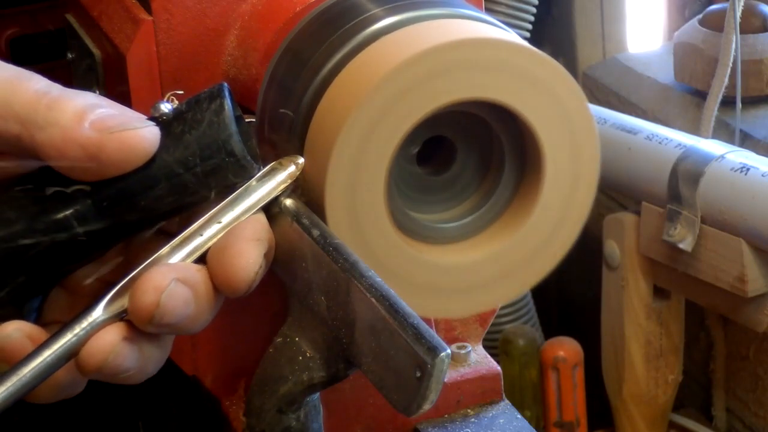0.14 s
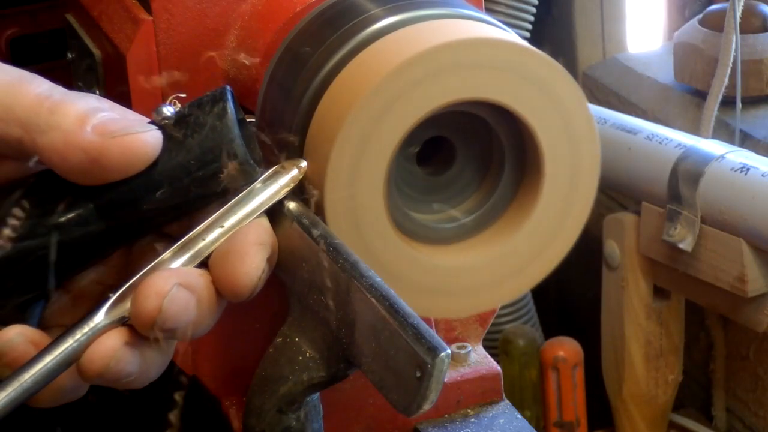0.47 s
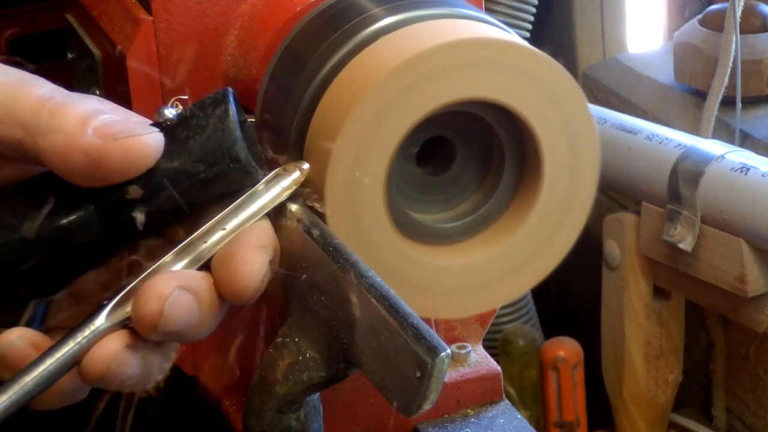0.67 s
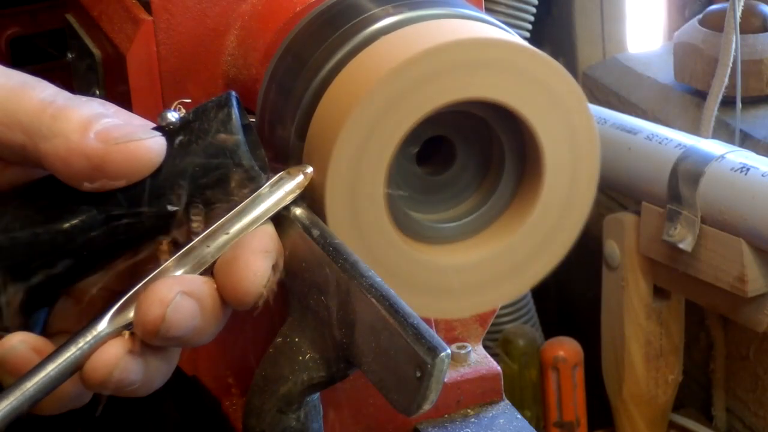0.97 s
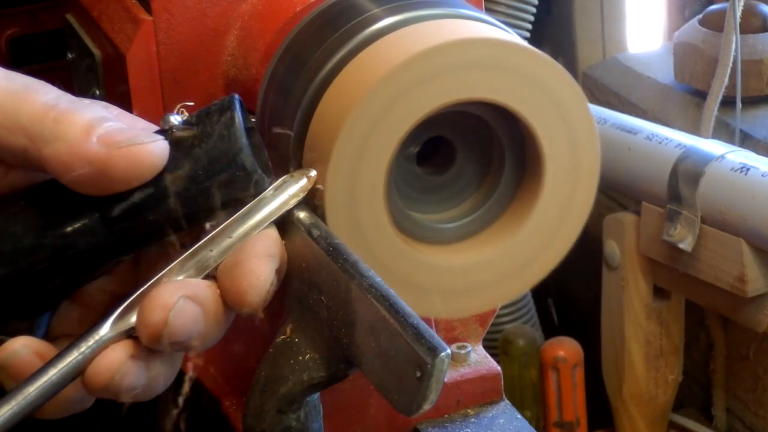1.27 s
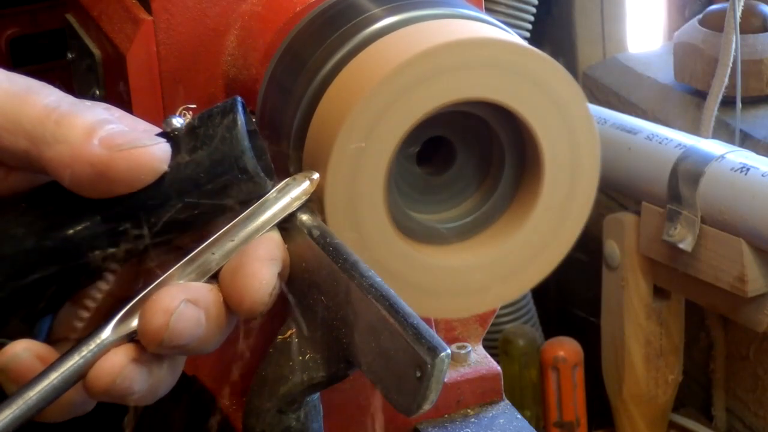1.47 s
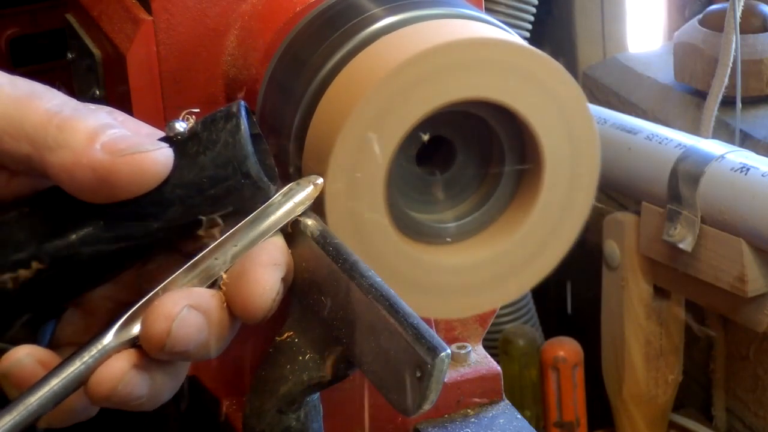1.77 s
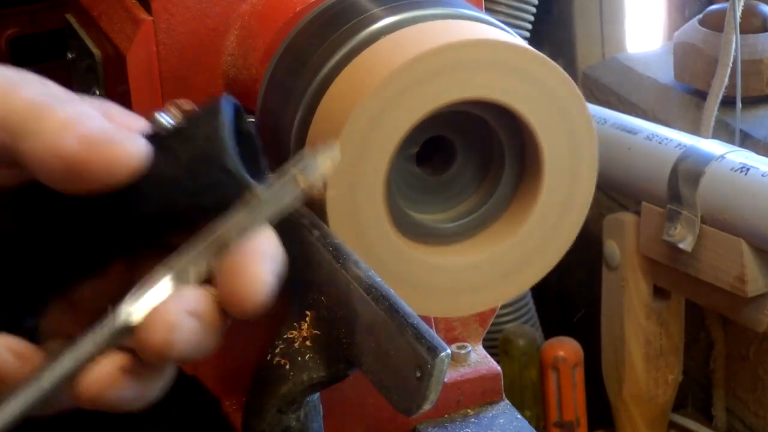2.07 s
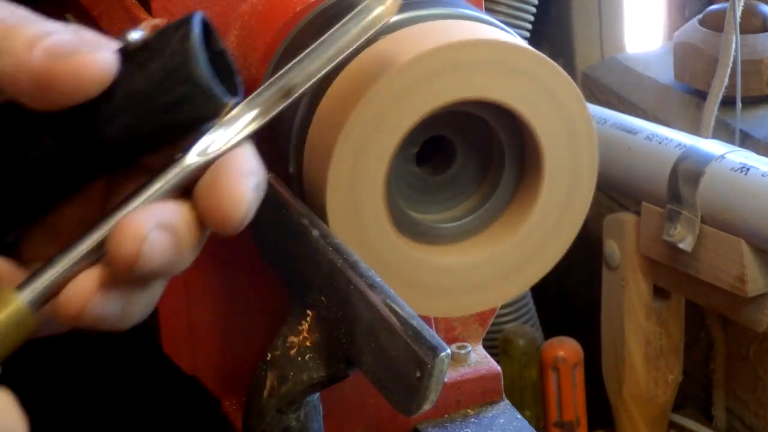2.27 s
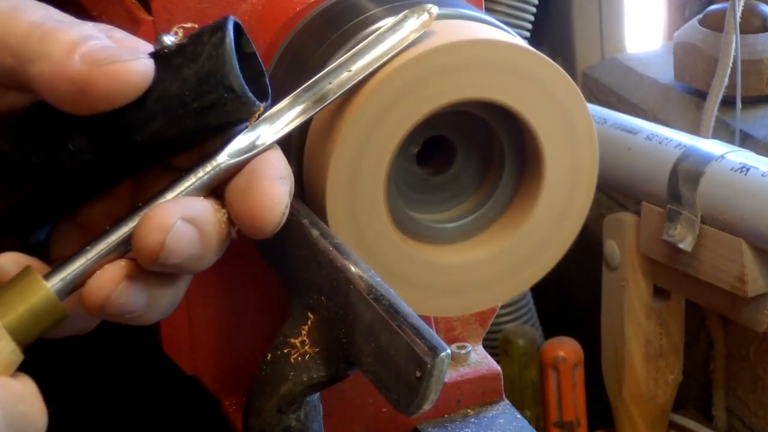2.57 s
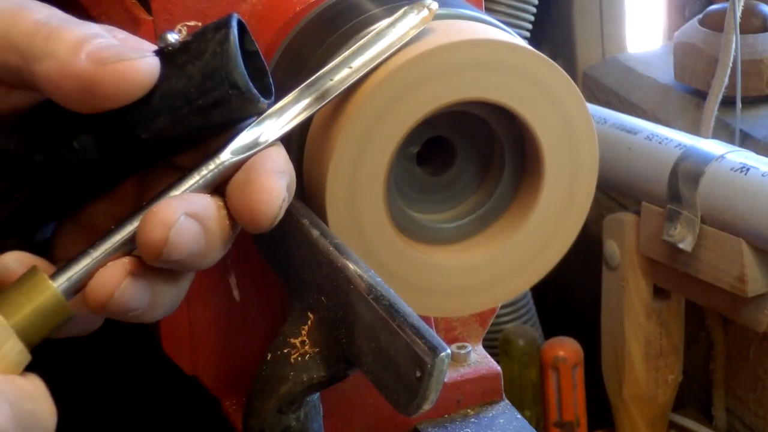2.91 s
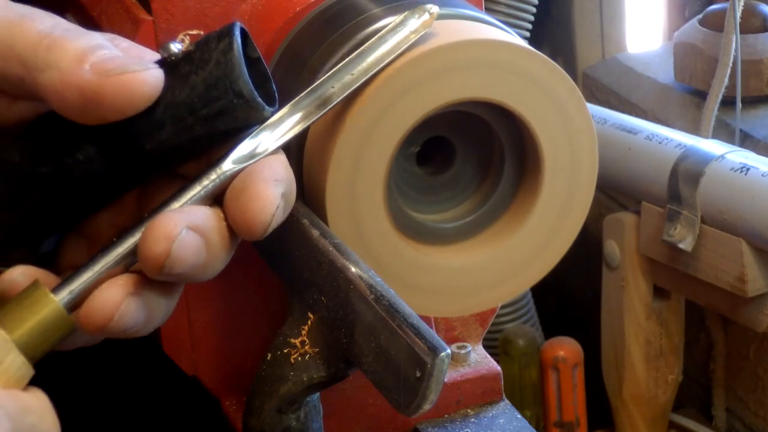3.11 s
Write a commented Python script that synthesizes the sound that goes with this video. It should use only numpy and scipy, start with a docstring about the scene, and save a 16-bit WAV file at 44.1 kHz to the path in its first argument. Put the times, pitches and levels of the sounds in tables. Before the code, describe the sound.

Close up in a small dry workshop, a lathe cut rasps and sings with sizzling shavings for nearly two seconds, stops, the machine drone swells suddenly, and the tool's smooth back buzzes softly on the wood.

```python
"""A gouge cuts a spinning ring glued from twelve wooden segments, lifts off, then its round back rides the ring.
The cut layers unsteady sines at spindle multiples, resonances driven by wood that comes round every turn,
and filtered noise for the shavings; glue joints modulate it. The ride is a dull buzz of the shaft with soft tones.
A lathe drive (sines) and suction hose (patchy noise) drone throughout in a small workshop.
The level is turned up sharply between the two passes."""
import sys
import numpy as np
from scipy import signal
from scipy.fft import rfft, irfft, next_fast_len
from scipy.io import wavfile
from scipy.ndimage import uniform_filter1d, map_coordinates

SR = 44100
rng = np.random.default_rng(int(sys.argv[2]) if len(sys.argv) > 2 else 0)


def transcribe(signal):
    """Save signal, clipped to [-1, 1], as a 16-bit WAV file at the path in sys.argv[1]."""
    frames = np.atleast_2d(signal).T
    limited = np.clip(frames, -1, 1)
    pcm = np.round(limited * 32767).astype(np.int16)
    wavfile.write(sys.argv[1], SR, pcm)


N = 143325
T = np.arange(N) / SR  # time [s]


def amp(db):
    """Gain for a level in dB."""
    return 10 ** (np.asarray(db) / 20)


def unit(x):
    """Scale to rms 1."""
    return x / np.sqrt(np.mean(x ** 2) + 1e-20)


def along(points, hz):
    """Read (frequency [Hz], value) points on a log frequency axis."""
    f, v = np.transpose(points)
    return np.interp(np.log(hz + 1), np.log(f + 1), v)


def curves(rows):
    """One value per sample for each column after the time."""
    s, *cols = np.transpose(rows)
    return [np.interp(T, s, c) for c in cols]


def wobble(rate):
    """A smooth random curve, rate knots a second."""
    knots = rng.standard_normal(int(N * rate / SR) + 4)
    return map_coordinates(knots, [T * rate])


def filtered(x, response):
    """Shape x by a complex response of frequency."""
    m = next_fast_len(N + SR // 2, True)
    return irfft(rfft(x, m) * response(np.fft.rfftfreq(m, 1 / SR)), m)[..., :N]


def body(x, base, peaks=()):
    """Causal colour: a smooth base with resonances on top; rms 1."""
    def response(f):
        power = amp(along(base, f)) ** 2
        for centre, width, db in peaks:
            power = power + (amp(db) * f * width) ** 2 / ((centre ** 2 - f * f) ** 2 + (f * width) ** 2)
        # folding the cepstrum forward gives minimum phase
        cepstrum = irfft(np.log(power + 1e-12) / 2)
        fold = np.r_[1, 2 * np.ones(len(f) - 2), 1, np.zeros(len(f) - 2)]
        return np.exp(rfft(cepstrum * fold))
    return unit(filtered(x, response))


def tones(rows, waver_db, rate):
    """Sines wavering in level and phase, from (frequency [Hz], rms level [dB]) rows."""
    total = 0
    for hz, db in rows:
        gain = np.sqrt(2) * amp(db + waver_db * wobble(rate))
        phase = 2 * np.pi * (hz * T + rng.random()) + 0.44 * wobble(rate)
        total = total + gain * np.sin(phase)
    return total


CUT_TURNS_HZ = 28.908  # spindle speed
LIFT_S, LIFT_FALL_DB_PER_S = 1.828, 700
# The cut, layer levels before each layer's trim: (time [s], thrum [dB], low thrum near 500 Hz [dB],
# blade ring [dB], upper ring [dB], shaving hiss [dB])
CUT_LEVELS = [(0, -37, -38.5, -29.5, -41, -32), (.08, -37.5, -40, -31, -44, -32.5),
              (.13, -38, -45, -36.5, -43, -36), (.3, -39, -44, -35, -48, -32.5),
              (.47, -36.5, -36.5, -34.5, -46, -32), (.61, -37.5, -42, -35.5, -47, -36),
              (.79, -37.5, -40.5, -31.5, -48, -32.5), (.92, -40, -42.5, -34, -46, -34),
              (1.2, -38.5, -43.5, -35.5, -48, -36), (1.5, -36.5, -41, -32, -44, -35.5),
              (1.66, -39, -44, -34.5, -42.5, -37.5), (1.8, -39.5, -40.5, -33.5, -42, -37.5)]


def cut():
    """The edge bites, rings and sheds shavings until it lifts off: (tones, noise)."""
    thrum_db, low_db, ring_db, upper_db, hiss_db = curves(CUT_LEVELS)
    lift = amp(-LIFT_FALL_DB_PER_S * np.clip(T - LIFT_S, 0, .2))
    thrum = spindle_thrum(thrum_db, low_db)
    noise = ringing_blade(ring_db, upper_db) + shavings(hiss_db)
    flutter = amp(0.6 * wobble(14.77))
    return lift * thrum, lift * flutter * noise


THRUM_DB, THRUM_LOW_DB = 2, 1.5  # trims
# Strong spindle multiples, relative: (multiple of the spindle speed, level [dB])
THRUM = [(12, -3), (13, -5), (14, -14), (21, -15), (22, -12), (24, -6), (26, -10), (28, -15), (32, -14),
         (36, 0), (37, -10), (38, -13), (39, -10), (40, -8), (42, -9), (43, -13)]
# Low multiples, relative: (multiple of the spindle speed, level [dB], level as the cut runs out [dB])
THRUM_LOW = [(16, 0, -6), (17, -2, 4), (18, 0, -3), (19, -5, 0), (20, -10, -9)]
# Start and end of the cut's running out: (time [s], time [s])
RUN_OUT_S = (1.55, 1.72)


def spindle_thrum(level_db, low_db):
    """Each turn repeats the same knocks, so the thrum sits on multiples of the spindle speed."""
    def orders(rows):
        return unit(tones([(k * CUT_TURNS_HZ, db) for k, db in rows], waver_db=2.5, rate=6.76))
    low_rows = [(k, np.interp(T, RUN_OUT_S, db)) for k, *db in THRUM_LOW]
    high = amp(level_db + THRUM_DB) * orders(THRUM)
    return high + amp(low_db + THRUM_LOW_DB) * orders(low_rows)


BLADE_KEEP = 0.68  # share of the passing roughness kept after a turn
BLADE_JOINT_DB, BLADE_DB, RING_DB, UPPER_DB = 3, 1, 0.6, 4.5  # joint rise, then trims
# Gouge on its rest, relative: (frequency [Hz], width [Hz], level [dB])
BLADE = [(1655, 140, -2.5), (1880, 360, -2.5), (2510, 90, -9), (3104, 53, 4.5), (3840, 24, -20)]
# Smooth tone of the blade, relative: (frequency [Hz], level [dB])
BLADE_BASE = [(150, -55), (300, -19), (1000, -13.5), (1500, -14.5), (2200, -10.5), (2800, -10),
              (4200, -11.5), (5200, -27), (7000, -25), (10000, -52)]
# Modes that drift as the edge crosses the ring: (start frequency [Hz], end frequency [Hz], width [Hz], level [dB])
RING = [(3300, 3390, 120, 0), (3615, 3700, 100, 0)]
# Upper modes, the second joining the first: (frequency [Hz], width [Hz], level [dB])
UPPER = [(4580, 90, 0), (4430, 60, 4)]


def ringing_blade(ring_db, upper_db):
    """Passing wood drives the steel's resonances, which drift as the edge crosses the ring."""
    joint_ring_db = np.transpose(JOINTS)[0]
    rough = surface(CUT_TURNS_HZ, BLADE_KEEP) * cut_joints(BLADE_JOINT_DB, joint_ring_db)
    across = np.pi / 2 * np.clip(T / LIFT_S, 0, 1)

    def drift(start, end):
        """Equal-power fade between two sets of modes over a near-silent base."""
        silent = [(4000, -120)]
        return np.cos(across) * body(rough, silent, start) + np.sin(across) * body(rough, silent, end)

    start_modes = [(a, w, db) for a, b, w, db in RING]
    end_modes = [(b, w, db) for a, b, w, db in RING]
    singing = amp(RING_DB) * drift(start_modes, end_modes)
    blade = amp(BLADE_DB) * body(rough, BLADE_BASE, BLADE)
    upper = drift(UPPER[:1], UPPER)
    return amp(ring_db) * (blade + singing) + amp(upper_db + UPPER_DB) * upper


SCRAPE_JOINT_DB, FIZZ_JOINT_DB, FIZZ_SPIKE_DB = 4, 7, 1.5
SCRAPE_DB, FIZZ_DB = 3, 1  # trims
# Smooth tone of the scrape, relative: (frequency [Hz], level [dB])
SCRAPE = [(150, -65), (400, -12.5), (1200, -8), (2500, -7.5), (3500, -4), (5000, -11.5), (7300, -5.5),
          (9300, -10), (10500, -20)]
# Resonances of the scrape, relative: (frequency [Hz], width [Hz], level [dB])
SCRAPE_PEAKS = [(5460, 97, -8), (6900, 86, -9.5), (7250, 120, -8), (9350, 360, -11)]
# Smooth tone of the fizz, relative: (frequency [Hz], level [dB])
FIZZ = [(7000, -51), (10500, 1), (11300, -6), (12000, -1), (13100, -5), (14300, -20), (15900, -32)]
# Resonances of the fizz, relative: (frequency [Hz], width [Hz], level [dB])
FIZZ_PEAKS = [(12300, 210, -2.5), (14100, 300, -12)]


def shavings(hiss_db):
    """Tearing fibres give fresh noise: a scrape in the mids and highs, a spiky fizz on top."""
    ring, hiss = np.transpose(JOINTS)
    scrape_noise = rng.standard_normal(N) * cut_joints(SCRAPE_JOINT_DB, (ring + hiss) / 2)
    scrape = body(scrape_noise, SCRAPE, SCRAPE_PEAKS)
    spikes = amp(FIZZ_SPIKE_DB * wobble(350))
    fizz_noise = rng.standard_normal(N) * cut_joints(FIZZ_JOINT_DB, hiss) * spikes
    fizz = body(fizz_noise, FIZZ, FIZZ_PEAKS)
    return amp(hiss_db) * (amp(SCRAPE_DB) * scrape + amp(FIZZ_DB) * fizz)


GRAIN_DB = 0  # lasting figure of the wood over the passing roughness


def surface(turns_hz, keep):
    """The wood's roughness comes round every turn and is slowly cut away; its figure lasts."""
    turns, size = T * turns_hz, round(SR / turns_hz)
    # one row per turn, each keeping a share of the one before; the first 30 settle the mix
    fresh = rng.standard_normal((int(turns[-1]) + 40, size))
    passing = signal.lfilter([1], [1, -keep], fresh, axis=0)[30:]
    figure = irfft(np.exp(2j * np.pi * rng.random(size // 2 + 1)), size)
    rows = unit(passing) + amp(GRAIN_DB) * unit(figure)
    return unit(rows[turns.astype(int), (turns % 1 * size).astype(int)])


JOINT_AT = 0.44  # place within a segment
# How hard the joints knock: (time [s], factor on their dB)
JOINT_DEPTH = [(0, .8), (.7, 1.15), (1.8, 1.3)]


def cut_joints(rise_db, each_db):
    """Glue joints passing under the cutting edge, with a depth that changes over the cut."""
    return joints(CUT_TURNS_HZ, JOINT_AT, rise_db, each_db, curves(JOINT_DEPTH)[0])


SEGMENTS, JOINT_WIDTH = 12, 0.13  # joint width as a share of a segment
# Each glue joint round the ring, added to a layer's rise: (blade ring [dB], hiss [dB])
JOINTS = [(2, 4), (-2, -1.5), (1.5, -1), (-2, -3), (2.5, 2.5), (.5, 2.5), (-1, 7), (-3, -1.5), (6, -2),
          (4.5, 2.5), (1.5, 5), (0, 4.5)]


def joints(turns_hz, at, rise_db, each_db, depth=1):
    """Gain that swells or dips as each glue joint passes the steel."""
    place = T * turns_hz * SEGMENTS - at + .5
    bump = np.exp(-((place % 1 - .5) / JOINT_WIDTH) ** 2 / 2)
    joint_db = np.asarray(each_db)[place.astype(int) % SEGMENTS]
    return amp(depth * bump * (rise_db + joint_db))


RIDE_TURNS_HZ = 29.08  # spindle speed
SHAFT_KEEP, SHAFT_JOINT_DB, SHAFT_FRESH_DB, SHAFT_AT = 0.51, -1.5, 0, 0.2  # SHAFT_AT: place in a segment
# Pressure on the ring: (time [s], level [dB])
RIDE = [(2.33, -71), (2.42, -42.5), (2.5, -41), (2.6, -37.5), (2.7, -37.5), (2.76, -37), (2.85, -37),
        (2.95, -38.5), (3.06, -35.5), (3.085, -38), (3.12, -51)]
# The shaft buzzing, relative: (frequency [Hz], width [Hz], level [dB])
SHAFT = [(676, 88, -6), (1270, 150, -3), (1690, 150, -0.5), (1890, 150, -0.5), (2150, 120, -3.5),
         (3180, 280, -6.5), (3470, 50, -3.5), (3810, 150, -9)]
# Smooth tone of the shaft, relative: (frequency [Hz], level [dB])
SHAFT_BASE = [(120, -60), (400, -18), (1000, -10.5), (1800, -20), (2600, -11), (4000, -19), (5500, -14),
              (7000, -64)]
# Soft tones of the ride: (multiple of the spindle speed, level relative to the buzz [dB])
RIDE_TONES = [(12, -17.5), (13, -23), (21, -23), (22, -21), (24, -17), (26, -19), (28, -22), (32, -23),
              (58, -17), (60, -15), (69, -17), (72, -15)]


def ride():
    """The smooth back of the gouge buzzes dully over the joints."""
    level_db, = curves(RIDE)
    rough = surface(RIDE_TURNS_HZ, SHAFT_KEEP) + amp(SHAFT_FRESH_DB) * rng.standard_normal(N)
    knocks = joints(RIDE_TURNS_HZ, SHAFT_AT, SHAFT_JOINT_DB, np.transpose(JOINTS)[0])
    buzz = body(rough * knocks, SHAFT_BASE, SHAFT)
    hum = tones([(k * RIDE_TURNS_HZ, db) for k, db in RIDE_TONES], waver_db=3, rate=14)
    touching = (T > RIDE[0][0]) * (T < RIDE[-1][0])
    return amp(level_db + 0.6 * wobble(18)) * (buzz + hum) * touching


DRONE_DB, DRONE_PATCHY_DB = -37, 1
# Hum of the drive: (frequency [Hz], level [dB])
HUM = [(54, -80), (166.9, -61), (376.8, -62), (1217, -55), (1297, -50), (1900, -53.5)]
# Smooth tone of the rush, relative: (frequency [Hz], level [dB])
DRONE = [(25, -66), (127, -16), (200, -21), (372, -5), (1040, -2), (1420, -4), (1940, -3), (3370, -7),
         (7000, -12), (10400, -7), (13900, -16.5), (15900, -33)]
# Resonances of the rush, relative: (frequency [Hz], width [Hz], level [dB])
DRONE_PEAKS = [(274.5, 51.5, -3.5), (1250, 190, -3), (1870, 54, 2.5), (2370, 32, -19), (2890, 260, -2),
               (3700, 34, -0.5), (3920, 36, -8), (4230, 80, -5.5), (4780, 560, -8.5), (6070, 200, -7.5),
               (6730, 66, -10.5), (8060, 120, -7.5), (11200, 270, -22), (13100, 700, -12), (14400, 400, -8)]


def machines():
    """Patchy noise rush of the suction over the drive's hum of unsteady sines."""
    z = signal.stft(rng.standard_normal(N), nperseg=512)[2]
    # random gain patches, smoothed over frequency, then time
    patches = uniform_filter1d(rng.standard_normal(z.shape), 6, 0)
    patches = unit(uniform_filter1d(patches, 8, 1))
    rush = signal.istft(z * amp(DRONE_PATCHY_DB * patches), nperseg=512)[1][:N]
    suction = amp(DRONE_DB + 0.81 * wobble(17)) * body(rush, DRONE, DRONE_PEAKS)
    return suction + tones(HUM, waver_db=1.5, rate=25)


ROOM_T60_S, ROOM_DB = 0.077, -7.5


def room(x):
    """A short dying noise tail of the workshop."""
    tail = rng.standard_normal(SR // 4) * amp(-60 * T[:SR // 4] / ROOM_T60_S)
    return signal.fftconvolve(x, tail / np.linalg.norm(tail))[:N]


SCATTER_DB = 2.5  # added to both width curves


def scattered(x, width):
    """The same sound with its phases shuffled, as nearby walls return it."""
    z = signal.stft(x, nperseg=256)[2]
    shuffled = z * np.exp(2j * np.pi * rng.random(z.shape))
    side = signal.istft(shuffled, nperseg=256)[1][:N]
    return filtered(side, lambda hz: amp(along(width, hz) + SCATTER_DB))


# Width of the cut, before the scatter trim: (frequency [Hz], side over mid [dB])
CUT_SIDE = [(110, -50), (200, -41), (380, -21.5), (700, -17), (1290, -34), (2380, -43.5), (4400, -9),
            (8120, -10.5), (15000, -6.5)]
# Width of the machines and the ride, before the scatter trim: (frequency [Hz], side over mid [dB])
DRONE_SIDE = [(110, -45), (200, -25), (380, -22), (700, -22), (1290, -30.5), (2380, -43), (4400, -15),
              (8120, -8.5), (15000, -4)]


def scene():
    """Stereo mix, near mono in the bass and wider in the treble."""
    thrum, noise = cut()
    buzz = ride()
    first = thrum + noise + amp(ROOM_DB) * room(noise)
    rest = buzz + amp(ROOM_DB) * room(buzz) + machines()
    side = scattered(first, CUT_SIDE) + scattered(rest, DRONE_SIDE)
    return np.array([first + rest + side, first + rest - side])


TOP_HZ = 15800
# Notches of the microphone housing: (frequency [Hz], width [Hz], depth [0-1])
NOTCHES = [(10350, 1300, 1), (7050, 90, .8), (7770, 70, .7)]
# The level being turned up: (time [s], gain [dB])
LEVEL_RIDE = [(0, -1.5), (1, -2.5), (1.8, -2.5), (1.85, -2.5), (2.02, 1.5), (2.0635, 3.5), (2.0645, 15.5),
              (2.15, 18.5), (3.25, 18)]


def record(dry):
    """Housing notches, the level turned up, then the band limit."""
    def notch(f):
        return np.prod([1 - depth / (1 + (2 * (f - c) / w) ** 2) for c, w, depth in NOTCHES], axis=0)
    levelled = filtered(dry, notch) * amp(curves(LEVEL_RIDE)[0])
    return filtered(levelled, lambda hz: hz < TOP_HZ)


dry = scene()
out = record(dry)
transcribe(out)
```